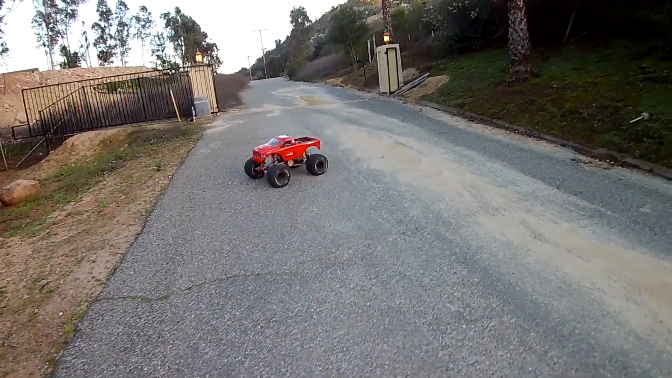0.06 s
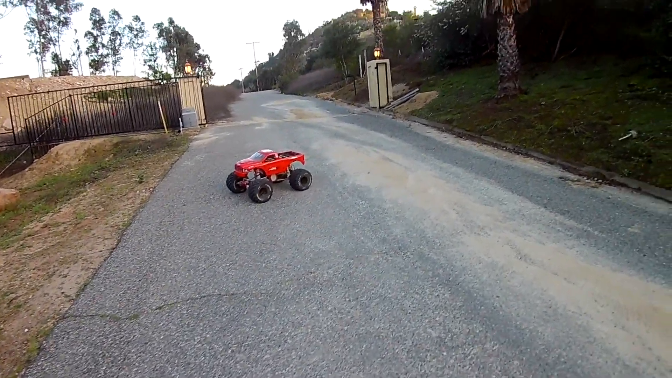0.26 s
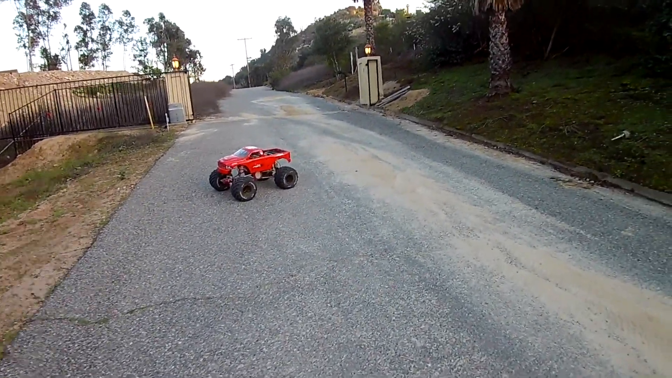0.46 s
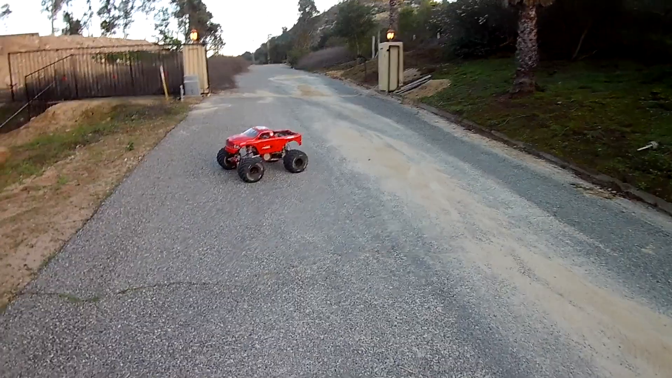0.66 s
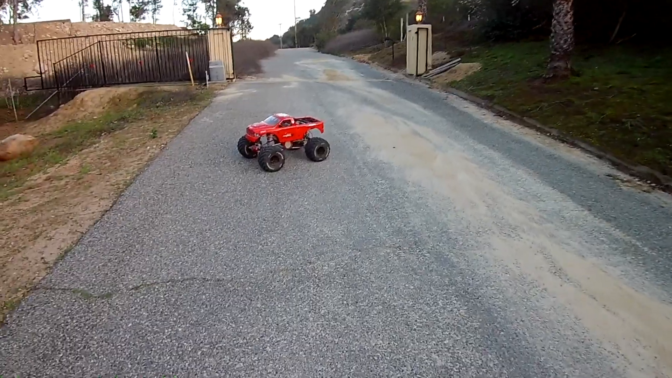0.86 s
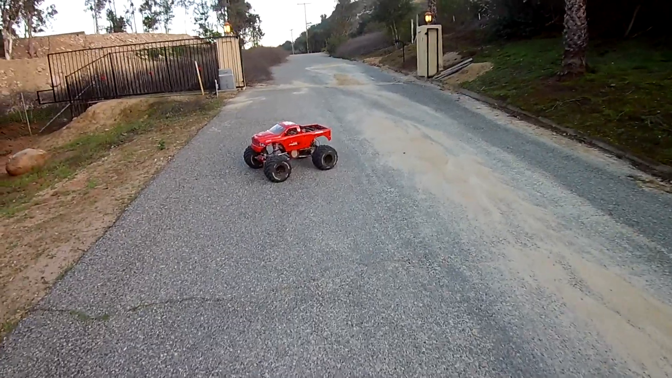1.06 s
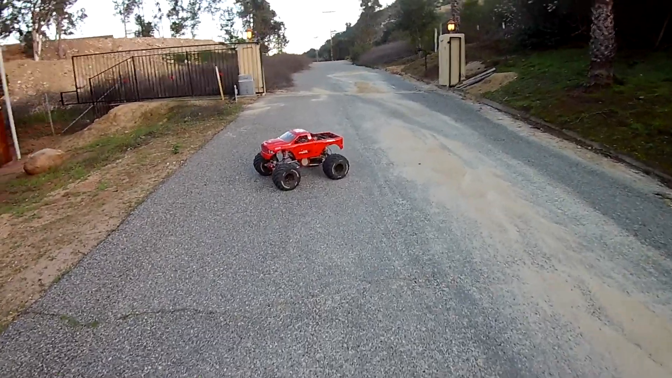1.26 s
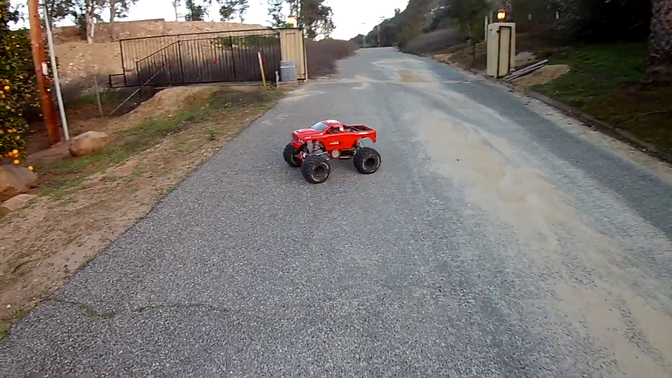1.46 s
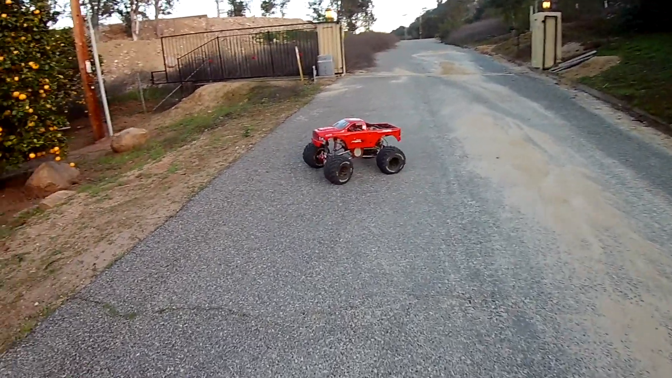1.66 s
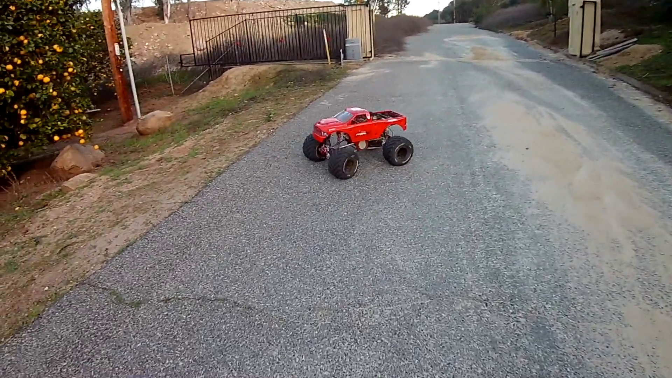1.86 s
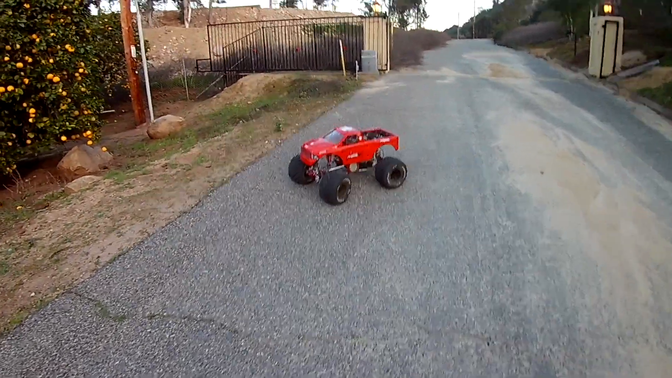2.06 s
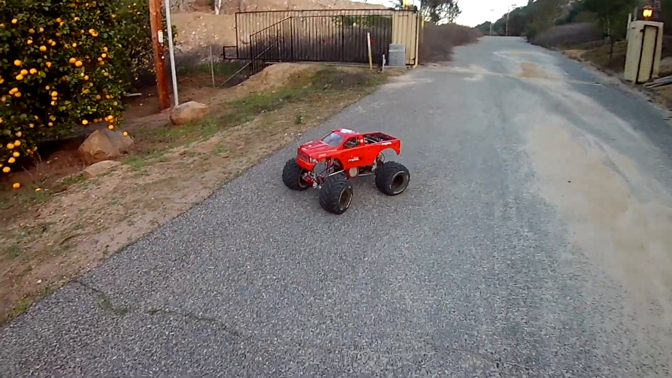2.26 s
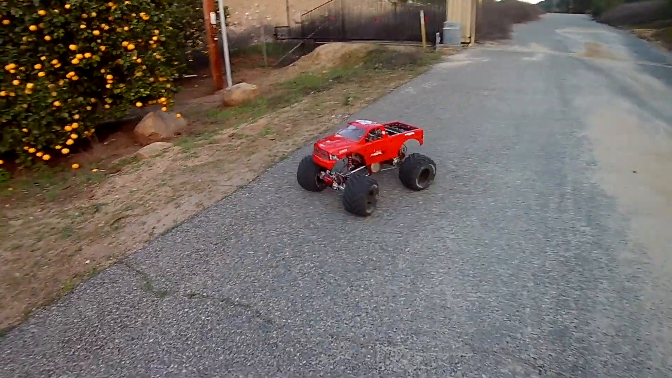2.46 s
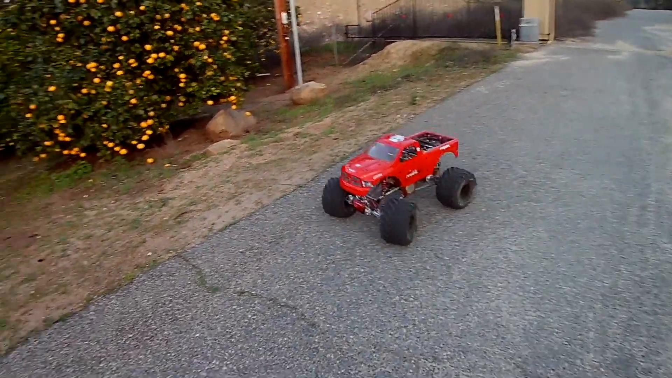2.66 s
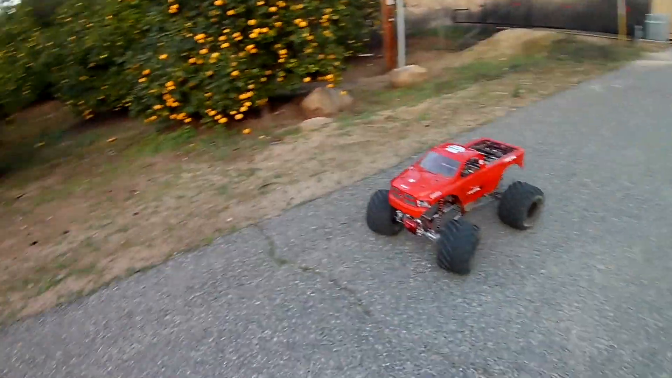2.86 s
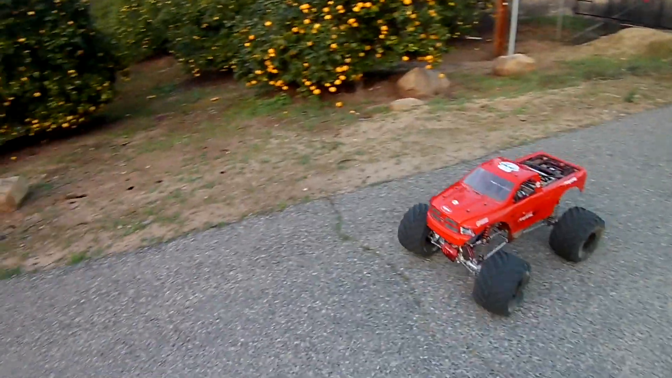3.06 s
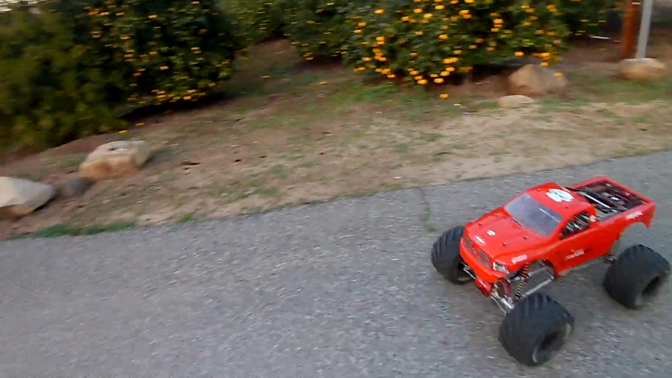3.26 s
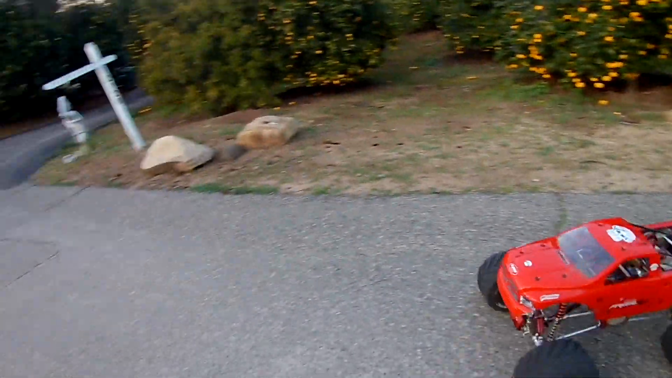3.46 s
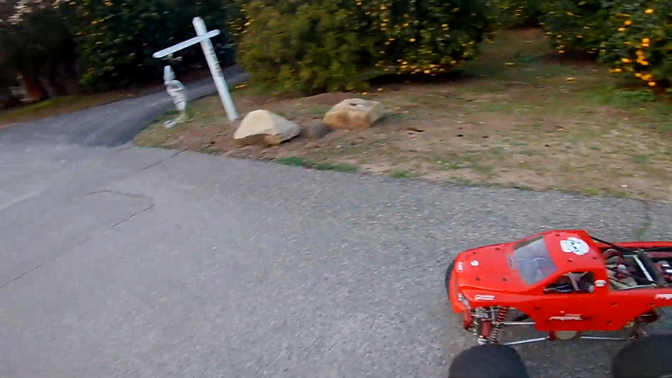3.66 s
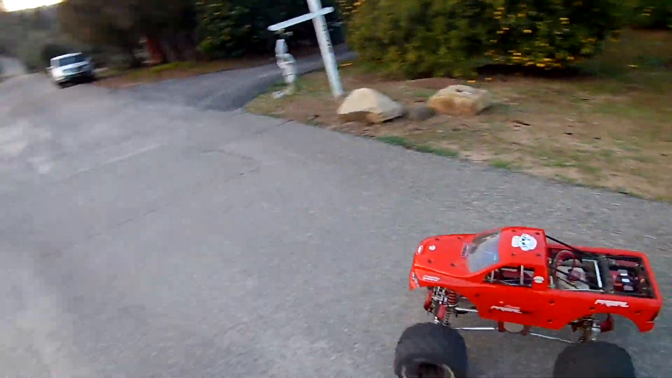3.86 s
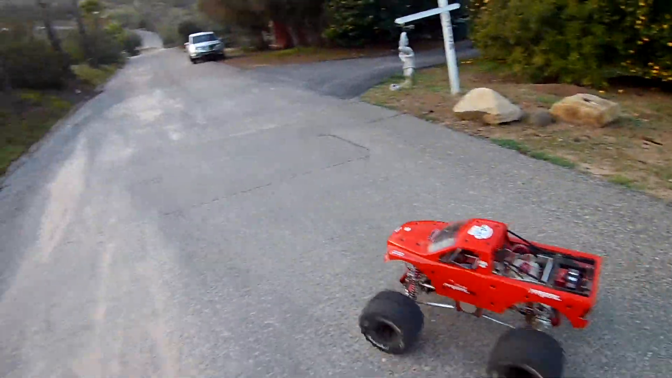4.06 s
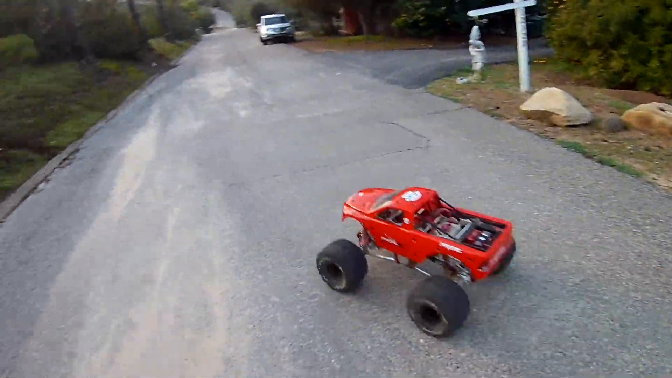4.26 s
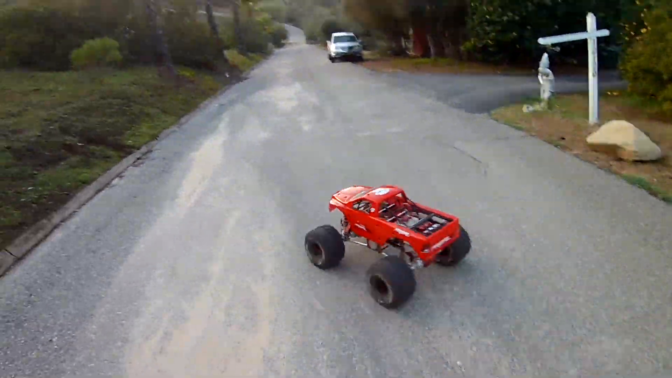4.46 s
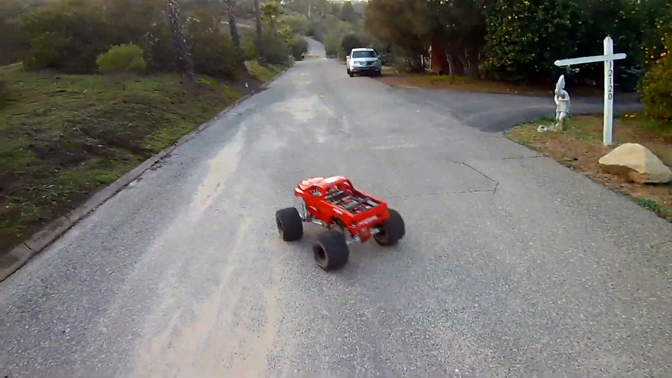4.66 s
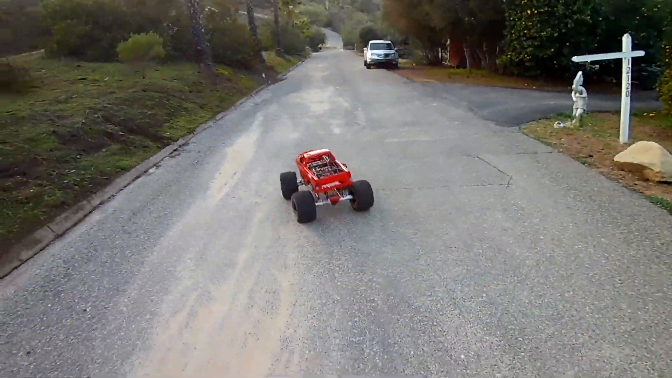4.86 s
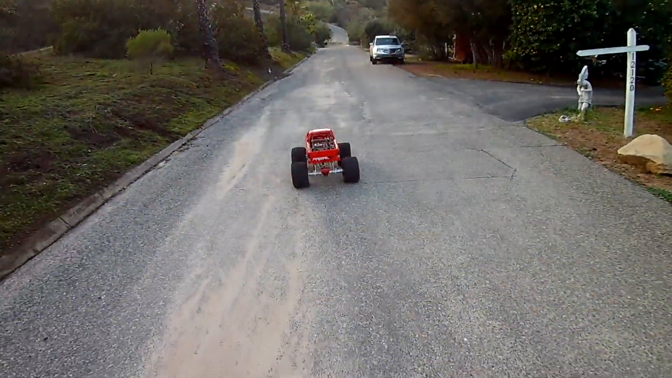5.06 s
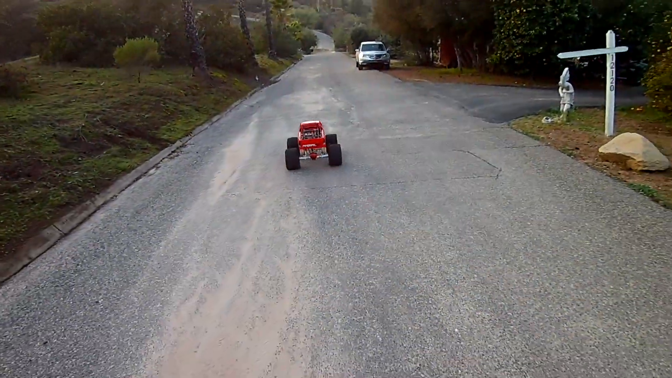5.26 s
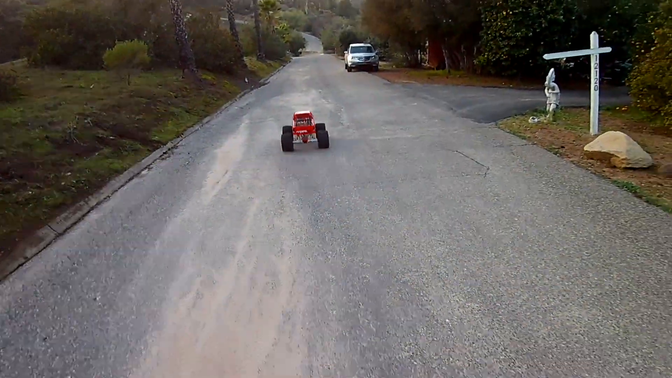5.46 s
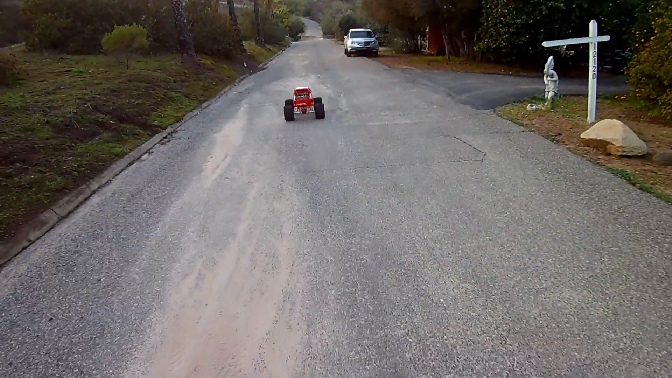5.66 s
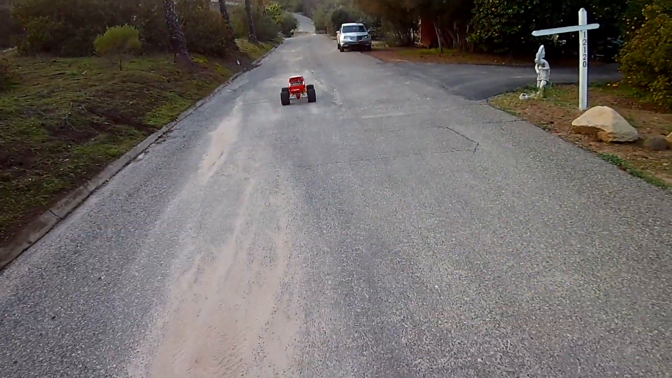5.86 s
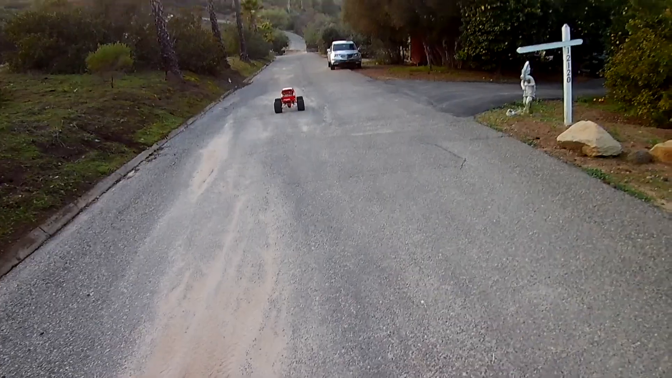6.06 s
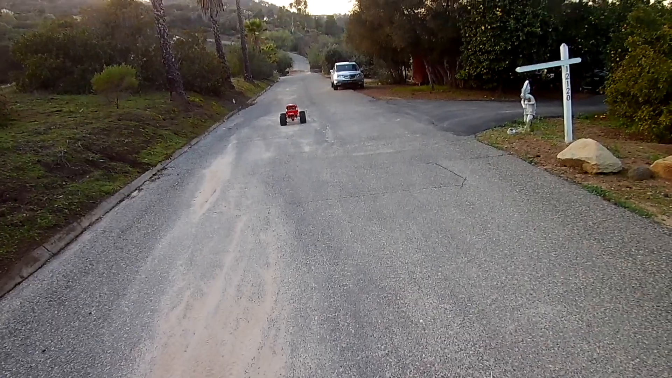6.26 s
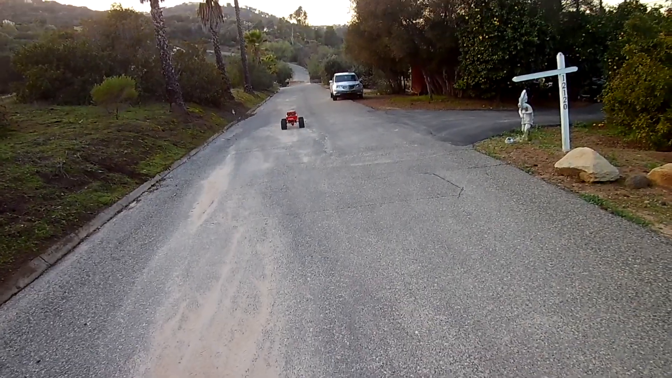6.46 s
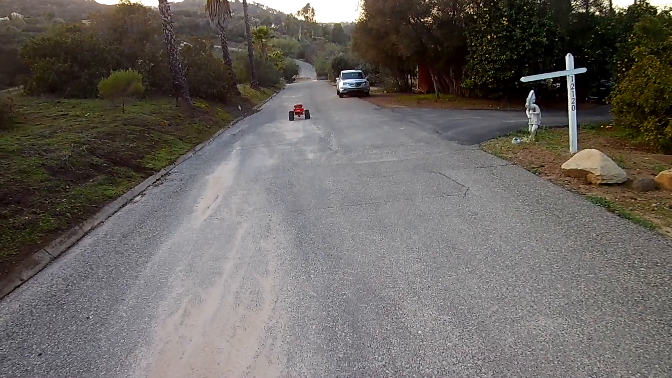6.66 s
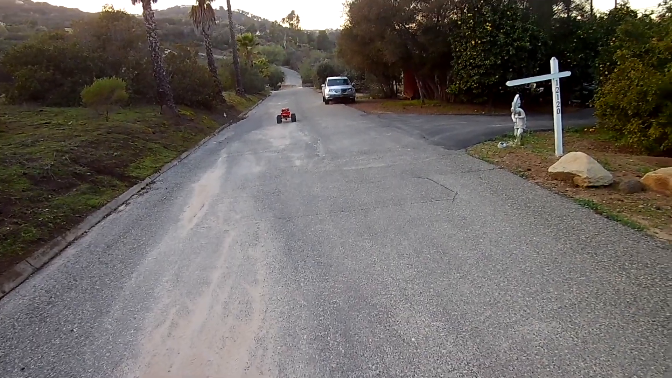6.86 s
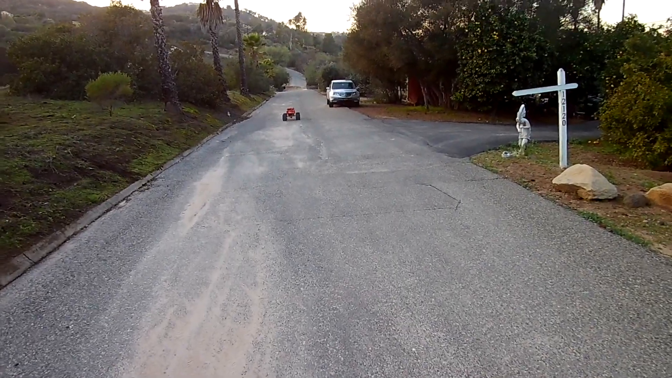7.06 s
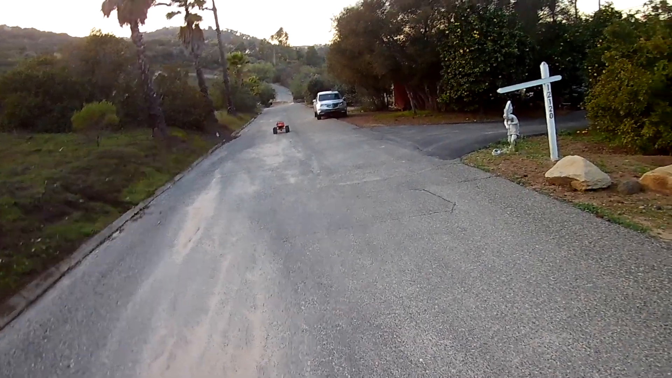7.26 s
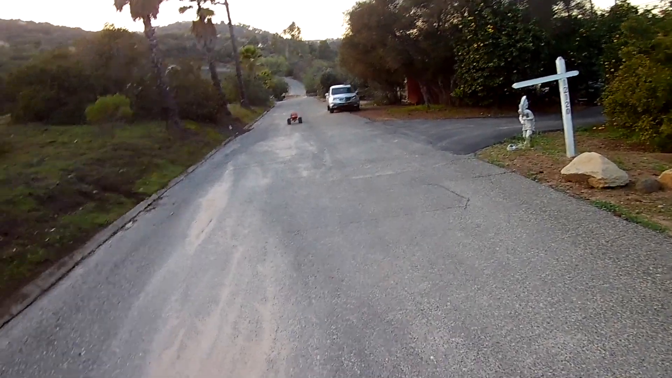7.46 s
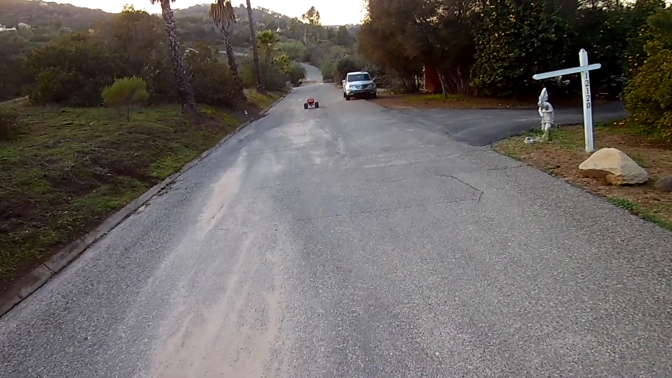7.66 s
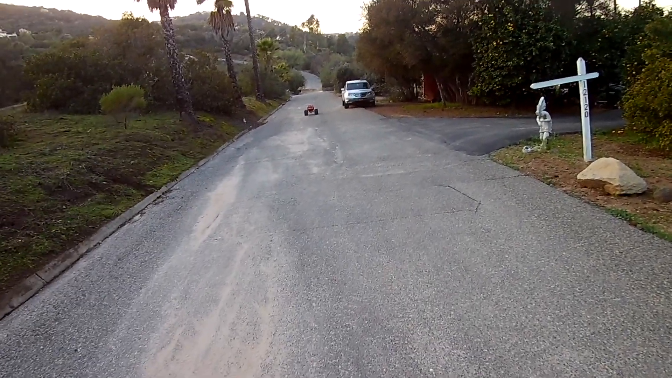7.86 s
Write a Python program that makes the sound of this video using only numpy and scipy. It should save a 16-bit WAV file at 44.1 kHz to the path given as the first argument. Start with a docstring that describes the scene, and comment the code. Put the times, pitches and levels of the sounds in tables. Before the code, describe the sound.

On a quiet outdoor road, the little gas engine of a toy truck putters and sputters, with short blips of throttle. Its popping and mechanical rattle get louder as it comes right by the microphone. The engine then revs into a steady, climbing whine as the truck drives off, and finally falls to a softer, sinking buzz. Light wind rumbles faintly underneath.

```python
"""Puffs of air and stray pops: a toy truck's small two-stroke engine idles on a paved lane, missing most
turns. It blips three times, rolls close past the microphone, then pulls away on full throttle and coasts.
Every turn pumps air and shakes the clutch and gears; each firing rings the exhaust, whose tone changes
as the truck turns. Banks and hedges return a short echo, over a distant hush and light wind."""
import sys
import numpy as np
from scipy import signal
from scipy.fft import rfft, irfft
from scipy.io import wavfile
from scipy.ndimage import uniform_filter1d

SR = 44100
rng = np.random.default_rng(int(sys.argv[2]) if len(sys.argv) > 2 else 0)


def dump_mix(stems):
    """Bounce the given channels to the path in sys.argv[1] as a 16-bit WAV at rate SR."""
    frames = np.atleast_2d(stems).T  # one column per channel
    limited = np.clip(frames, -1, 1)  # hard clip at full scale
    pcm = np.round(limited * 32767).astype(np.int16)
    wavfile.write(sys.argv[1], SR, pcm)


N = 349393
TIME = np.arange(N) / SR


def undb(db):
    return 10 ** (np.asarray(db) / 20)


def level(x, db):
    return x * undb(db) / np.sqrt(np.mean(x ** 2))


def steady(x, window):
    """Hold the running RMS at 1 over a window of samples."""
    return x / np.sqrt(uniform_filter1d(x ** 2, window) + 1e-12)


def curve(s, value):
    return np.interp(TIME, s, value)


def spell(s, span, ease_s=.1):
    """0 outside the span, 1 inside, with soft edges."""
    return np.clip(np.minimum(s - span[0], span[1] - s) / ease_s + .5, 0, 1)


def walk(per_s):
    """Random levels joined by ramps; spread near 1."""
    hold = int(SR / per_s)
    return uniform_filter1d(np.repeat(rng.standard_normal(N // hold + 1), hold), hold)[:N]


def clicks(s, size):
    """Clicks at any time, each shared between two samples."""
    at = np.clip(s * SR, 0, N - 2)
    i = at.astype(int)
    return np.bincount(i, size * (1 + i - at), N) + np.bincount(i + 1, size * (at - i), N)


def tail(x, decay_s):
    """Each click dies away exponentially."""
    return signal.lfilter([1], [1, -np.exp(-1 / (decay_s * SR))], x)


def ring(x, hz, width_hz):
    """One mode that rings up fast and dies away; a wider second pass steepens the skirts."""
    x = signal.lfilter(*signal.iirpeak(hz, hz / width_hz, SR), x) * SR / (2 * np.pi * width_hz)
    return signal.lfilter(*signal.iirpeak(hz, hz / (3 * width_hz), SR), x)


def band(x, hz, width_hz):
    """Steep-sided band around hz."""
    edges = np.clip([hz - width_hz / 2, hz + width_hz / 2], 5, 16000)
    return signal.sosfilt(signal.butter(3, edges, "band", fs=SR, output="sos"), x)


def colour(x, hz, db, size=8192):
    """Minimum-phase filter with the gain given at a few frequencies, falling away outside them."""
    bin_hz = np.arange(1, size // 2 + 2) * SR / size
    edge_hz, edge_db = np.r_[hz[0] / 3, hz, hz[-1] * 2], np.r_[db[0] - 30, db, db[-1] - 60]
    gain = undb(np.interp(np.log(bin_hz), np.log(edge_hz), edge_db))
    cepstrum = irfft(np.log(gain))
    cepstrum[1:size // 2] *= 2
    cepstrum[size // 2 + 1:] = 0
    response = irfft(np.exp(rfft(cepstrum)))[:size // 4]
    return signal.oaconvolve(x, response)[:N]


# The engine at low revs, near the microphone. Each row: start in seconds, crank turns to the next row,
# turns per firing, pop level in dB.
IDLE_FIRINGS = [(0.0509, 15, 15, -24.5), (0.3563, 3, 1, -28), (0.413, 2, 2, -20), (0.4469, 1, 1, -21),
                (0.462, 12, 3, -25), (0.6797, 14, 14, -22), (0.9549, 6, 3, -35), (1.0629, 2, 2, -19),
                (1.0952, 6, 3, -17.5), (1.2001, 5, 5, -29), (1.298, 4, 2, -37), (1.37, 2, 2, -14.5),
                (1.4035, 6, 1, -18), (1.4921, 19, 1, -13.5), (1.766, 2, 2, -13), (1.7967, 3, 3, -13),
                (1.846, 4, 4, -17), (1.914, 7, 7, -19.5), (2.0502, 3, 3, -19.5), (2.106, 6, 2, -11),
                (2.2039, 3, 1, -13), (2.2494, 16, 1, -13), (2.4881, 6, 6, -13), (2.589, 6, 3, -10.5),
                (2.694, 12, 3, -14.5), (2.9174, 4, 2, -14), (2.988, 8, 2, -8), (3.1188, 36, 2, -8.5),
                (3.692, 14, 2, -1.5), (3.9127, 7, 1, -4.5), (4.0198, 4, 2, -7), (4.0794, 4, 4, -4),
                (4.145, 6, 3, -4.5), (4.242, 5, 5, -11.5), (4.323, 3, 3, -8), (4.3699, 2, 1, -3),
                (4.4016, 2, 1, -5.5), (4.4295, 2, 1, -1.5), (4.456, 2, 1, -2), (4.4813, 3, 1, -7),
                (4.519, 2, 2, -1.5), (4.5431, 4, 2, -2), (4.6013, 9, 9, -2.5), (4.7402, 3, 3, -17),
                (4.782, 8, 8, -21), (4.909, 4, 2, -7.5), (4.967, 1, 1, -11)]


def idling(sag_turns_per_s2=22, faint_share=.3, faint_db=-29):
    """Time and pop dB of each slow turn; most miss, though some of those still burn faintly."""
    start_s, turns, every, pop_db = np.transpose(IDLE_FIRINGS)
    turns, every = np.round(turns).astype(int), np.round(every).astype(int)
    first_turn = np.cumsum(turns) - turns
    turn = np.arange(-3, first_turn[-1])
    turn_s = np.interp(turn, first_turn, start_s) + np.minimum(turn, 0) / 52  # lead-in at 52 turns/s
    row = np.clip(np.searchsorted(first_turn, turn, "right") - 1, 0, None)
    since, until = turn_s - start_s[row], start_s[row + 1] - turn_s
    sag_s = sag_turns_per_s2 * since.clip(0) * until * (since + until) / turns[row] / 2
    turn_s -= (every[row] >= 4) * sag_s  # between rare firings the crank slows down
    fired = (turn - first_turn[row]) % every[row] == 0
    missed_db = np.where(rng.random(len(turn)) < faint_share, faint_db, -np.inf)
    return turn_s, np.where(fired, np.interp(turn_s, start_s, pop_db), missed_db)


# Revs going away down the lane and coasting. Each row: time in seconds, crank turns per second.
AWAY_REVS = [(5.0, 83.0), (5.05, 90.8), (5.06, 90.5), (5.09, 86.7), (5.15, 82.1), (5.26, 87.4),
             (5.36, 95.4), (5.45, 100.9), (5.52, 103.7), (5.57, 107.9), (5.62, 110.8), (5.84, 120.8),
             (5.87, 123.4), (5.97, 127.2), (6.21, 134.8), (6.41, 138.8), (6.45, 141.2), (6.51, 140.4),
             (6.64, 144.9), (6.7, 144.1), (6.8, 148.1), (6.86, 146.5), (6.97, 149.8), (7.05, 143.0),
             (7.17, 129.1), (7.24, 131.4), (7.33, 134.8), (7.49, 128.1), (7.58, 123.2), (7.66, 120.1),
             (7.88, 113.7), (7.92, 114.0)]
# The firings on that run. Each row: time in seconds, pop level in dB.
AWAY_POPS = [(4.97, -12), (5.148, -8), (5.3, -9), (5.5, -7), (5.7, -4.5), (5.9, -7.5), (6.1, -4.5),
             (6.28, -6), (6.5, -6), (6.75, -7), (6.95, -6.5), (7.03, -22), (7.18, -29), (7.28, -23.5),
             (7.6, -25.5), (7.92, -28.5)]
FULL_THROTTLE_S = (5.05, 7.0)


def pulling_away(limp_s=(6.36, 6.56), limp_db=3):
    """Time and pop dB of each fast turn: all fire, most evenly on full throttle."""
    t = TIME[int(IDLE_FIRINGS[-1][0] * SR):]
    waver = 1 + .0025 * walk(per_s=16)[:len(t)]  # bumps in the road
    turns_done = np.cumsum(np.interp(t, *np.transpose(AWAY_REVS)) * waver) / SR
    turn = np.arange(int(turns_done[-1]))
    turn_s = np.interp(turn, turns_done, t)
    scatter_db = 2.4 - 2 * spell(turn_s, FULL_THROTTLE_S)
    pop_db = np.interp(turn_s, *np.transpose(AWAY_POPS)) + scatter_db * rng.standard_normal(len(turn))
    pop_db -= turn % 2 * limp_db * spell(turn_s, limp_s)  # briefly, every second firing is weaker
    jitter_s = .00004 * scatter_db * rng.standard_normal(len(turn))  # an uneven burn shifts the blow-down
    return turn_s + jitter_s, pop_db


# Modes of the crankcase and intake. Each row: frequency in Hz, width in Hz, relative gain in dB.
INTAKE_MODES = [(64, 170, -25), (118.5, 36, 5.5), (201, 99, 22), (338, 140, -13)]
# Pumped air at the microphone. Each row: time in seconds, level in dB.
INTAKE_LEVELS = [(0, -41.5), (1.3, -39.5), (1.57, -40), (1.9, -40.5), (3.0, -39), (3.77, -38.5),
                 (4.222, -37), (4.5, -37.5), (4.9, -33)]


def intake(turn_s, lead_s=.001):
    """The piston pumps a puff of air on every turn, fired or not; it fades as the throttle opens."""
    s, air_db = np.transpose(INTAKE_LEVELS)
    puffs = clicks(turn_s - lead_s, undb(1.2 * rng.standard_normal(len(turn_s))))
    air = sum(undb(db) * ring(puffs, hz, width) for hz, width, db in INTAKE_MODES)
    air = signal.sosfilt(signal.butter(5, 710, fs=SR, output="sos"), air)
    fade = curve([s[-1], s[-1] + .3], [1, 0])
    return undb(curve(s, air_db)) * steady(air, SR // 4) * fade


def intake_hum(turn_s, hum_db=-44, fade_s=(2.54, 2.68)):
    """An intake hum through the opening idle and blips, higher as the revs rise."""
    turns_per_s = curve(turn_s, 1 / np.gradient(turn_s))
    hz = (455 + 5.6 * (turns_per_s - 50)) * (1 + .0174 * walk(per_s=58.9))
    hum = np.sqrt(2) * np.sin(2 * np.pi * np.cumsum(hz) / SR)
    return hum * undb(hum_db + 1.3 * walk(per_s=51.5)) * curve(fade_s, [1, 0])


def rattle(turn_s, jolt, bands, beat=3, decay_s=.006, repeat_share=.4, ring_s=.018):
    """Noise shaken by the crank, plus loose parts struck the same way turn after turn; RMS 1."""
    shake = steady(1 + beat * tail(clicks(turn_s + .0022, jolt), decay_s), SR // 8)
    t = TIME[:SR // 20]
    drift = 2 * np.cumsum(np.abs(walk(per_s=2))) / SR  # slow blend between two clatters
    clatter = 0
    for blend in (np.cos(drift), np.sin(drift)):
        strike = rng.standard_normal(len(t)) * t * np.exp(-2 * t / ring_s)
        clatter += blend * signal.oaconvolve(clicks(turn_s, jolt), strike)[:N]
    clatter = np.sqrt(repeat_share) * steady(clatter, SR // 8)
    parts = 0
    for hz, width, db in bands:
        noise = np.sqrt(1 - repeat_share) * shake * rng.standard_normal(N)
        flicker = undb(1.8 * walk(per_s=25))
        parts += level(band(noise + clatter, hz, width), db) * flicker
    return level(parts, 0)


# Bands of the clutch and of the gears. Each row: centre in Hz, width in Hz, relative level in dB.
CLUTCH_BANDS = [(934, 285, -3.5), (1255, 240, 1)]
GEAR_BANDS = [(469, 554, 1.5), (1760, 656, 0.5), (1793, 2330, -3)]
# Both rattles at the microphone. Each row: time in seconds, clutch level in dB, gear level in dB.
DRIVETRAIN_LEVELS = [(0, -51, -49), (.57, -44.5, -46.5), (.85, -46, -47.5), (1.1, -41, -43),
                     (1.28, -43.5, -45), (1.5, -43, -38), (1.75, -43, -38), (2.0, -42, -45.5),
                     (2.3, -40, -36), (2.45, -39, -36), (2.602, -30, -41.5), (3.001, -27.5, -36.5),
                     (3.4, -32, -31), (3.9, -30, -29), (4.3, -32.5, -30.5), (4.5, -29.5, -30),
                     (4.75, -32, -42.5), (5.1, -28.5, -27.5), (5.3, -42, -33), (5.6, -45, -39),
                     (6.1, -45, -40), (6.5, -42, -37), (6.7, -45, -39), (6.95, -44, -39),
                     (7.05, -33.5, -35.5), (7.4, -36.5, -39), (7.92, -47, -42.5)]


def drivetrain(turn_s, jolt):
    """Clutch and gears rattle with each jolt of the crank."""
    s, clutch_db, gear_db = np.transpose(DRIVETRAIN_LEVELS)
    clutch = rattle(turn_s, jolt, CLUTCH_BANDS, beat=2.3, decay_s=.0029)
    gears = rattle(turn_s, jolt, GEAR_BANDS)
    return undb(curve(s, clutch_db)) * clutch + undb(curve(s, gear_db)) * gears


# The bright edge of the rattle. Each row: centre in Hz, width in Hz, relative level in dB.
HISS_BANDS = [(2490, 207, -1.5), (2900, 690, -1.5), (3754, 720, 1), (4610, 770, -8.5)]


def hiss(turn_s, jolt, pop_db, closest_s=3.59, pass_s=1):
    """A hissing rattle that grows with the power of the firings and as the truck nears the microphone."""
    window = int(.087 * SR)
    energy = clicks(turn_s, undb(2 * pop_db))
    power = uniform_filter1d(uniform_filter1d(energy, window), window) * SR
    nearness = np.exp(-((TIME - closest_s) / pass_s) ** 2)
    db = -53.5 + 5 * np.log10(np.abs(power) + .0063) + 8 * nearness
    return undb(db) * rattle(turn_s, jolt, HISS_BANDS, repeat_share=.2)


# The rattle's highest bands. Each row: centre in Hz, width in Hz, relative level in dB.
FINE_HISS_BANDS = [(5600, 380, 0.5), (6746, 1000, 6), (8560, 1500, -2), (9780, 420, -7),
                   (10500, 2400, -6.5), (14200, 2400, -11)]
# Their sum at the microphone. Each row: time in seconds, level in dB.
FINE_HISS_LEVELS = [(0.0, -68), (0.26, -69.5), (0.57, -61), (0.77, -69), (1.7, -56.5), (1.98, -66),
                    (2.27, -55), (2.89, -59.5), (3.73, -52.5), (4.1, -55), (4.28, -60), (4.41, -53),
                    (4.76, -62.5), (4.83, -58), (6.22, -51), (6.29, -54), (6.88, -50), (7.15, -61),
                    (7.39, -59), (7.92, -65)]


def fine_hiss(turn_s, jolt):
    """Thin treble noise that pulses gently with the crank."""
    noise = rattle(turn_s, jolt, FINE_HISS_BANDS, beat=.82, decay_s=.012, repeat_share=0)
    return undb(curve(*np.transpose(FINE_HISS_LEVELS))) * noise


# Hush from far beyond the lane. Each row: frequency in Hz, relative spectral level in dB.
HUSH = [(29, -40), (50, -26), (70, -10), (232, 1.5), (357, -3), (700, -10), (910, -30.5), (1540, -120)]
# Wind in the lane. Each row: time in seconds, level in dB before the gusts.
WIND_LEVELS = [(0, -50.5), (1.2, -44), (2.5, -50.5), (3.5, -47), (4.2, -38), (5, -51), (6.7, -61),
               (7.92, -59)]


def lane():
    """A steady distant hush, and the low rumble of light, gusting wind."""
    hz, db = np.transpose(HUSH)
    bin_hz = np.arange(1, N // 2 + 2) * SR / N
    gain = undb(np.interp(np.log(bin_hz), np.log(hz), db))
    hush = irfft(rfft(rng.standard_normal(N)) * gain, N)
    wind = level(band(rng.standard_normal(N), hz=70, width_hz=45), 0)
    wind_db = curve(*np.transpose(WIND_LEVELS)) + 2 * walk(per_s=2.1)
    return level(hush, db=-50) + wind * undb(wind_db)


def silencer(x, hz=1250, width_hz=450):
    """All-pass: the silencer holds its ring back behind the first crack."""
    radius = np.exp(-np.pi * width_hz / SR)
    poles = [1, -2 * radius * np.cos(2 * np.pi * hz / SR), radius ** 2]
    return signal.lfilter(poles[::-1], poles, x)


# How the truck stands to the microphone. Each row: time in seconds, view of the tailpipe from 0 to 8.
HEADINGS = [(0, 0), (2.5, 0), (3.0, 1), (3.3, 1), (3.7, 2), (4.2, 2), (4.36, 3), (4.8, 3), (5.0, 4),
            (5.14, 4), (5.3, 5), (5.5, 5), (5.8, 6), (6.2, 6), (6.55, 7), (6.99, 7), (7.07, 8)]
# The tailpipe from the microphone. Each row: frequency in Hz, then gain in dB for each view: nose on,
# quartering, side on, turning away, setting off, near, mid, far, far with the throttle shut.
TAILPIPE_TONE = [(62.3, 27.5, 30.5, 29.5, 18, 19, 27.5, 9.5, 13, 17),
                 (100, 29, 20, 8, 24.5, 27, 20.5, 14, 17.5, 20),
                 (153, 23.5, 18.5, 24, 15, 23, 31, 22.5, 21.5, 13.5),
                 (212, 17, 23, 9, 11, 17, 27.5, 23, 11.5, 18.5),
                 (274, 26.5, 21.5, 6, 21.5, 27, 32.5, 24, 18, 24.5),
                 (329, 27, 21.5, 15.5, 23, 31.5, 28.5, 35, 28.5, 24.5),
                 (438, 23, 10, 22, 5, 20, 15, 23, 24.5, 34),
                 (527, 23.5, 19.5, 19, -12, 24, 28, 23.5, 22.5, 23.5),
                 (660, 8, -11, 14.5, 11.5, 3, 17, 26.5, 27.5, 17),
                 (753, 26.5, 26.5, 22, 16.5, 19, 34, 21.5, 26.5, 34.5),
                 (848, 25, 26.5, 18, 24, 14.5, 25.5, 39, 38.5, 35.5),
                 (896, 28, 18, 19, 25.5, 17, 35, 41, 38.5, 20),
                 (963, 21, 30, 22.5, 25, 27, 38, 31.5, 39.5, 36),
                 (1022, 21, 18, 14, 11, 14.5, 24, 29.5, 21, 29),
                 (1108, 6, 4, 18, 11, 3, 21, 25.5, 19, 36.5),
                 (1183, 24, 27, 26, 21.5, 20, 20.5, 21.5, 14.5, 18),
                 (1320, 31, 24.5, 18.5, 13, 11, 22, 4, 6.5, 5),
                 (1375, 23.5, 25, 9, 3, 3, 2.5, 22.5, 25.5, 13),
                 (1640, 20, 12, 27.5, 19.5, 15, -8, 3.5, 10.5, 23.5),
                 (1851, 16, 3, -1, -4, 24, 21, 20, 18.5, 22.5),
                 (2040, 17.5, 15, 10, -10, 16, 1, -5.5, -12, -13),
                 (2340, 9, -8, -7, 9, -1, -4, -10, -10.5, 15), (2670, 11, -1, -7, 1, -3, 12.5, 3.5, 2.5, 0),
                 (2930, 0.5, 15.5, 10.5, -20, -17, -1.5, -16, -5, -11),
                 (3460, -3, -10, -5, -11, -15, -10, -8, -1.5, -1),
                 (3630, 5.5, -2, 0, -5, -5, 12.5, -10.5, -7.5, -2),
                 (4060, -5, -10, -17, 16.5, 11, -19.5, 11, 10, 2),
                 (4010, -10, -3, -12, 1, -19, -22, -11, -16.5, -5),
                 (4570, -18.5, 3.5, 2.5, -11, -16, -10.5, -24, -1.5, 5)]
# Brief resonances that brighten the exhaust pops, each over its own time span.
# Each row: frequency in Hz, width in Hz, start in seconds, end in seconds, gain in dB.
POP_RINGS = [(3700, 250, 1.36, 1.85, -16), (1290, 110, 1.4, 2.55, -14), (2110, 140, 2.08, 2.55, -11),
             (990, 90, 4.44, 4.56, -8), (2020, 400, 5.0, 5.42, -11), (3600, 500, 5.35, 6.25, -19),
             (4400, 250, 6.15, 6.9, -24)]


def exhaust(turn_s, pop_db, reflection_s=.0028, side_views=(1, 2)):
    """Each firing is a pulse, its inverted reflection from the pipe's open end and a puff of gas."""
    heading = curve(*np.transpose(HEADINGS))
    size = undb(pop_db + .5 * rng.standard_normal(len(turn_s)))
    pulses = clicks(turn_s, size)
    reflection_db = np.interp(heading, range(4), (-9, -9, -11, -30))  # strongest from the front
    reflection = undb(reflection_db) * clicks(turn_s + reflection_s, size)
    gas = undb(-46) * tail(pulses, decay_s=.006) * rng.standard_normal(N)
    drive = pulses - reflection + gas
    held_back = silencer(drive)
    tone_hz, *views = np.transpose(TAILPIPE_TONE)
    pops = np.zeros(N)
    for view, tone_db in enumerate(views):
        share = np.clip(1 - np.abs(heading - view), 0, 1)
        pops += share * colour(held_back if view in side_views else drive, tone_hz, tone_db)
    for hz, width, *span, db in POP_RINGS:
        pops += undb(db) * spell(TIME, span) * ring(drive, hz, width)
    return pops


def hedge_echo(pops, t60_s=.4, gap_s=.02, db=-25):
    """Banks and hedges scatter the pops back as a short, diffuse echo."""
    t = TIME[:SR // 2]
    response = band(rng.standard_normal(len(t)), hz=1210, width_hz=2210)
    response *= undb(-60 * t / t60_s) * (t > gap_s)
    return undb(db) * signal.fftconvolve(pops, response / np.linalg.norm(response))[:N]


def distant_fading(pops, spread_db=3, above_hz=1100, patch_hz=200, patch_s=.09):
    """Bumps and moving air: once the truck pulls away, patches of the treble swell and fade."""
    hz, t, spectrum = signal.stft(pops, SR, nperseg=1024)
    patches = rng.standard_normal(spectrum.shape)
    for _ in range(2):
        patches = uniform_filter1d(patches, int(patch_hz / hz[1]), axis=0)
        patches = uniform_filter1d(patches, int(patch_s / t[1]), axis=1)
    treble = np.clip(4 * (hz / above_hz - 1), 0, 1)[:, None]
    away = spell(t, (FULL_THROTTLE_S[0], np.inf))
    gain = undb(spread_db * treble * away * patches / patches.std())
    return signal.istft(spectrum * gain, SR, nperseg=1024)[1][:N]


def scene():
    """One crank times every sound of the truck, heard in mono from one spot on the lane."""
    turn_s, pop_db = np.hstack([idling(), pulling_away()])
    jolt = np.where(pop_db > -29, 1, .4)  # a firm firing jolts harder than a faint or missed one
    pops = distant_fading(exhaust(turn_s, pop_db))
    air = intake(turn_s) + intake_hum(turn_s)
    rattles = drivetrain(turn_s, jolt) + hiss(turn_s, jolt, pop_db) + fine_hiss(turn_s, jolt)
    return (air + rattles + lane() + pops + hedge_echo(pops))[None]


def record(dry, dip_hz=8100, dip_width_hz=1500):
    """A phone microphone whose port has a dip in the treble; deep bass and the top are cut."""
    x = signal.lfilter(*signal.iirnotch(dip_hz, dip_hz / dip_width_hz, SR), dry)
    x = signal.sosfilt(signal.butter(2, 45, "high", fs=SR, output="sos"), x)
    return signal.sosfilt(signal.ellip(10, .2, 80, 15800, fs=SR, output="sos"), x)


dry = scene()
out = record(dry)
dump_mix(out)
```